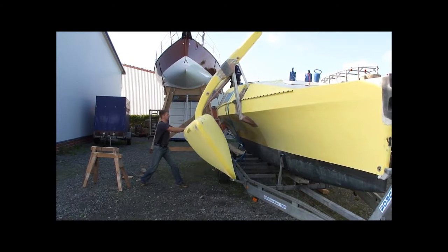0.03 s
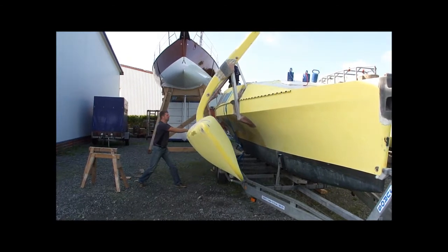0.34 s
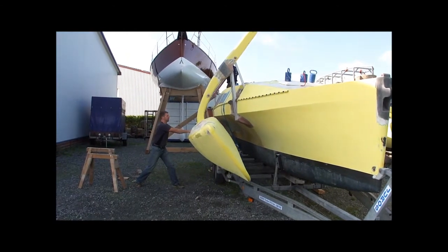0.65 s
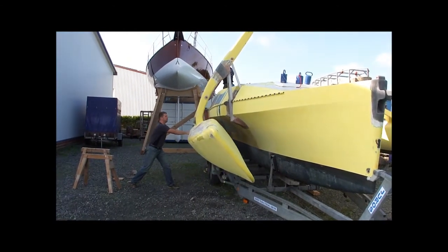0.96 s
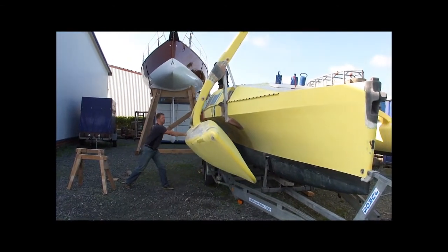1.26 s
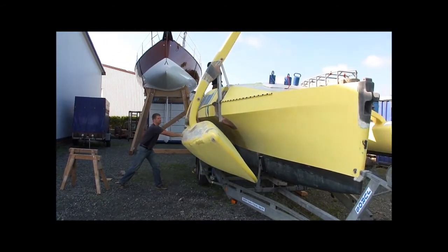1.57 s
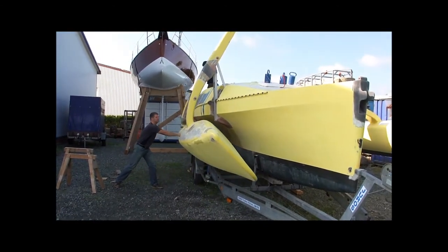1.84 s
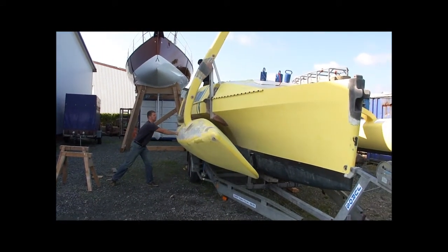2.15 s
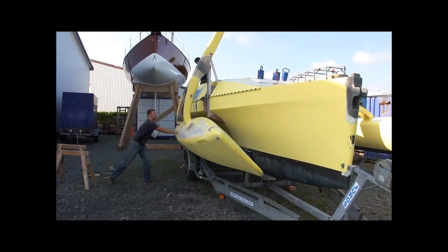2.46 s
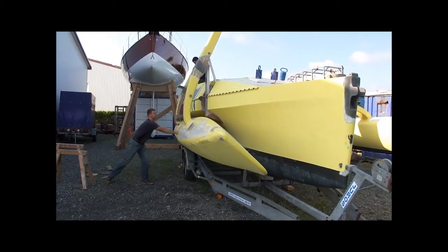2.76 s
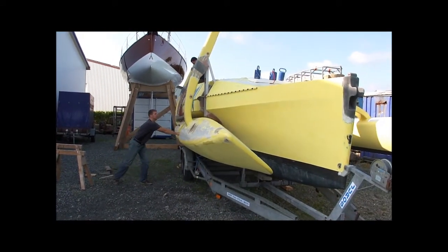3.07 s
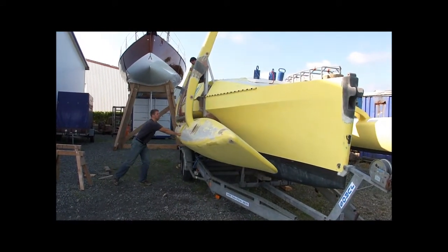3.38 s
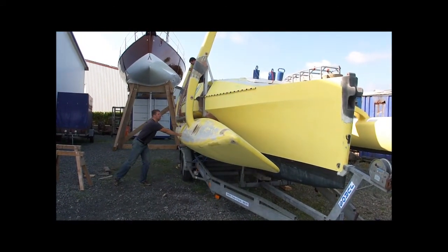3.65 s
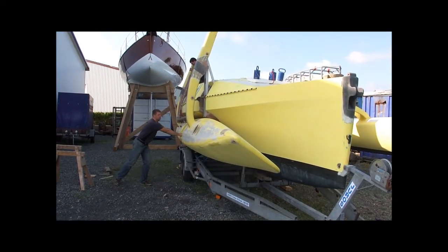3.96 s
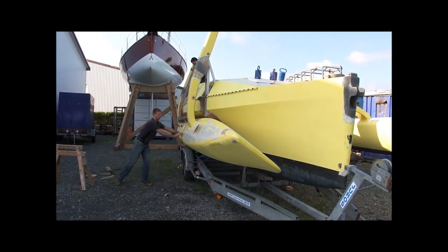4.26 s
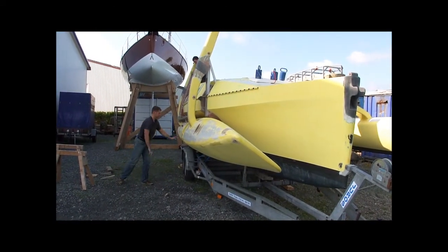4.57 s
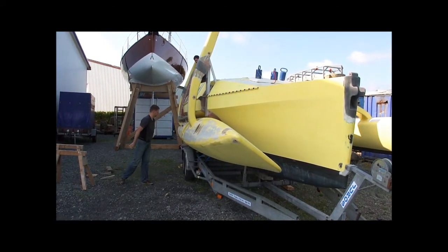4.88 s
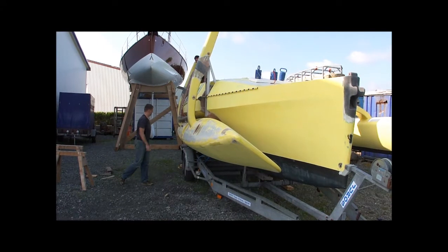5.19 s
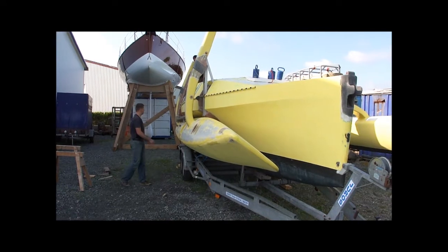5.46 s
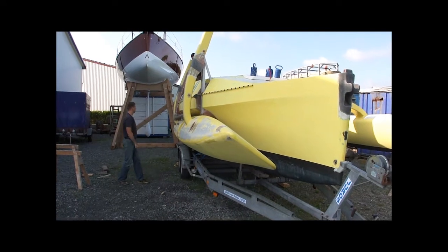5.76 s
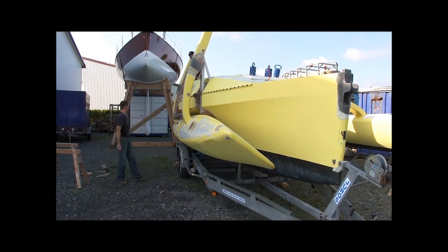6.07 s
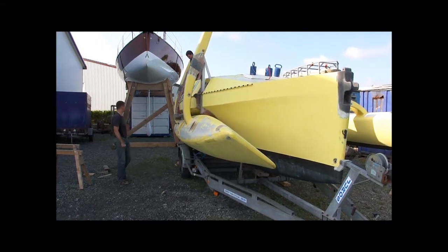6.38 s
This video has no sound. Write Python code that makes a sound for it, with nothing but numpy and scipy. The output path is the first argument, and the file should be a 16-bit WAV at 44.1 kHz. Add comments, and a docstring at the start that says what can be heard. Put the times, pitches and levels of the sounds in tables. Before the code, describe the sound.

Irregular hollow knocks, scrapes and short creaks as a boat's float is pushed in, then footsteps on gravel, over a steady outdoor rush.

```python
"""A man pushes a trimaran's hollow float in on its folding arms, over a gravel boatyard's steady rush.
First the camera's zoom motor ticks. Then the joints stick and slip: knocks, scrapes and short groans
excite the modes of arm and hull, while a thin whine, far whistles and two microphone pops come and go.
Midway the zoom runs again and shoes crunch on the stones. Near the end come more steps and whistles,
one more pop and the last knocks, and finally the friction of fingers on the camera."""
import sys
import numpy as np
from scipy import signal
from scipy.fft import rfft, irfft, next_fast_len
from scipy.io import wavfile

SR = 44100
rng = np.random.default_rng(int(sys.argv[2]) if len(sys.argv) > 2 else 0)


def dump_mix(stems):
    """Bounce the given channels to the path in sys.argv[1] as a 16-bit WAV at rate SR."""
    frames = np.atleast_2d(stems).T  # one column per channel
    limited = np.clip(frames, -1, 1)  # hard clip at full scale
    pcm = np.round(limited * 32767).astype(np.int16)
    wavfile.write(sys.argv[1], SR, pcm)


N = 283563
T = np.arange(N) / SR


# normal modes of the float's shell and of the arm: (frequency [Hz], level [dB], decay time T60 [s])
HULL_MODES = [(138.9, -15, 0.7), (173.4, -1, 0.32), (214, -14, 0.5), (228.5, -1.5, 0.51),
              (272.2, -6.5, 0.48), (306, -3, 0.4), (342, 1.5, 0.28), (628, 2, 0.27), (740, 7.5, 0.36),
              (780, -14, 0.11), (882, -2, 0.31), (1537, 4.5, 0.15), (2070, -21, 0.15)]
ARM_MODES = [(286.2, -10.5, 0.26), (393, -8, 0.45), (511.2, -8, 0.33), (548, -2.5, 0.34), (690, -6, 0.32),
             (755, 1, 0.22), (1085, 0, 0.11), (1272, -5, 0.05), (1804, -25, 0.076), (2250, -9, 0.22)]
# spectra of a knock's three parts: (frequency [Hz], spectral level [dB])
CLATTER_SPECTRUM = [(25, -58), (80, -79), (250, -8.5), (450, 1), (800, 3.5), (1100, 1), (1500, -2),
                    (2100, -5.5), (2700, -13), (5000, -32), (10000, -47), (16000, -72)]
BOOM_SPECTRUM = [(25, -50), (60, -1), (110, 1.5), (170, 16.5), (230, 14), (290, 17), (420, 0.5),
                 (1000, -64)]
CRACK_SPECTRUM = [(1000, -32), (3000, -18), (6000, 7), (8000, 2.5), (10000, 1), (16000, -1)]
# slips of the joints: (time [s], clatter [dB], boom [dB], crack [dB], clatter tilt [dB/octave])
JOINT_KNOCKS = [(0.411, -26, -30, -59, 7), (0.453, -13, -23.5, -43, 2.5), (0.493, -21.5, -27, -48, -11),
                (0.620, -13.5, -20.5, -43, 3.5), (0.648, -28, -25, -50, 6), (0.666, -18.5, -17, -36, 11),
                (0.711, -15, -38, -45, 0), (0.734, -18, -21, -58, -4), (0.751, -23, -26.5, -60, -23),
                (0.769, -14.5, -24, -43.5, 3.5), (0.792, -36, -24.5, -56, 8), (0.858, -17, -35, -47, 2.5),
                (0.883, -19, -24, -60, -9), (0.982, -15.5, -28, -45, -1), (1.007, -19, -25.5, -54, -7),
                (1.085, -32, -36, -60, -6), (1.537, -23.5, -33.5, -57, -1), (1.671, -20.5, -18.5, -41, 0.5),
                (1.769, -16.5, -28, -44.5, -3), (1.848, -23, -24, -66, -5), (1.987, -25, -29, -61, -6),
                (2.153, -27, -44, -64, -15), (2.651, -15.5, -41, -62, -3.5), (2.671, -21, -35, -62, -10),
                (2.701, -21.5, -26.5, -66, -8), (2.725, -17, -19, -60, -3), (2.797, -14, -42, -40.5, -1),
                (2.825, -15.5, -15.5, -36.5, 1.5), (2.844, -16.5, -26, -49, -4.5),
                (2.897, -21.5, -37, -51, -1), (2.931, -16.5, -30, -46, 1.5),
                (2.987, -15.5, -20.5, -32, -5.5), (3.013, -28, -21, -38, 2), (3.038, -17.5, -30, -48, 3),
                (3.068, -32, -34, -49, -2), (3.123, -15, -27, -42.5, 4), (3.146, -15.5, -22.5, -46, -2.5),
                (3.189, -12.5, -20, -45, -2), (3.221, -30, -27, -58, -4), (3.263, -36, -34.5, -58, 1),
                (3.527, -29.5, -46, -68, -2), (3.572, -37, -54, -64, -10), (3.755, -23.5, -26.5, -50, 2.5),
                (3.774, -20, -35, -47, 5), (3.809, -15.5, -34, -40.5, 1.5), (3.864, -16.5, -15, -48, 1),
                (3.884, -25, -27, -46, -5), (3.901, -29, -27, -58, -3), (3.927, -20.5, -27.5, -56, 3),
                (4.125, -11, -16.5, -42.5, -2), (4.195, -17.5, -23, -43.5, 3), (4.237, -26.5, -31, -62, -3),
                (4.509, -25, -46, -42, 0), (4.912, -32, -47, -66, -3.5), (5.765, -17.5, -26, -40, 2),
                (5.846, -9.5, -18, -41, -0.5), (5.907, -37, -34, -65, -9)]
def knocks():
    """Impulse excitation: a slip cracks at the joint, clatters in the arm and booms in the float."""
    out, t = np.zeros((2, N)), np.arange(SR // 2) / SR
    give_s, boom_rise_s, ring = 0.003, 0.004, 0.69
    attack = 1 - np.exp(-(t / give_s) ** 2)  # the joint gives a little before it lets go
    swing_up = 1 - np.exp(-(t / boom_rise_s) ** 2)  # the big shell responds more slowly
    for s, clatter_db, boom_db, crack_db, tilt_db in JOINT_KNOCKS:
        stutter = amp(1.8 * np.interp(t * 350, np.arange(400), rng.standard_normal(400)))
        rattle = burst(t, tilted(CLATTER_SPECTRUM, tilt_db, 690), 1070, 0.74, direct=1.54, direct_s=0.013)
        clatter = amp(-3) * unit_hit(stutter * rattle) + amp(-6.5) * modal_ring(t, ARM_MODES, tilt_db)
        thud = burst(t, BOOM_SPECTRUM, 200, ring, direct=0.45, direct_s=0.0016)
        boom = amp(-4.5) * thud + amp(-2.85) * modal_ring(t, HULL_MODES)
        crack = amp(3) * burst(t, CRACK_SPECTRUM, 7000, ring, direct=0.89, direct_s=0.005)
        joint = amp(clatter_db) * clatter + amp(crack_db) * crack
        add(out, s - .0025, joint * attack + amp(boom_db) * boom * swing_up)
    return out


# catches of a slipping joint: (time [s], frequency [Hz], level [dB], rise to the peak [cycles])
JOINT_JOLTS = [(0.6229, 835, -9, 0.52), (0.668, 232, -6, .8), (0.6893, 385, -10, 0.49),
               (0.7105, 1050, -7, 0.66), (0.772, 900, -3.5, 0.45), (0.8595, 780, -8, 1.8),
               (0.889, 430, -10, 0.51), (0.9835, 790, -11, 1.4), (1.0096, 375, -8, 0.51),
               (1.428, 910, -7, 0.43), (1.673, 216, -15, 1.4), (2.154, 660, -29, 1.7),
               (2.6505, 1580, -3, 0.45), (2.671, 550, -25, .37), (2.8265, 225, -11.5, 1.4),
               (2.8273, 520, -9, 0.39), (2.989, 1080, -2.5, 0.42), (3.1915, 670, -3, 0.88),
               (3.528, 553, -15.5, 2), (3.5715, 605, -21, 1.5), (3.8645, 258, -4, 0.88),
               (3.8694, 516, -18, 0.41), (3.8843, 470, -8, 0.52), (4.1285, 786, -11, 0.98),
               (5.7655, 725, -17, 0.73), (5.849, 174, -17, 1.4), (5.85, 664, -6, 0.5)]
def jolts():
    """Heavy damping: a joint that catches swings the float's side for only a few cycles."""
    out, t = np.zeros((2, N)), np.arange(SR // 12) / SR
    for s, hz, db, rise_cycles in JOINT_JOLTS:
        age = hz * t / rise_cycles
        swing = np.sin(2 * np.pi * hz * t) * age * np.exp(1 - age)
        add(out, s, np.outer([1, 0], amp(db) * swing))
    return out


# one dry click: (frequency [Hz], spectral level [dB])
CRUNCH_SPECTRUM = [(200, -27), (700, 1), (1200, 1.5), (1800, 4), (2400, 1.5), (2900, -4), (5000, -24),
                   (12000, -52)]
# grinding in the joints: (time [s], duration [s], level [dB])
JOINT_CRUNCHES = [(0.604, .012, -32), (0.712, .011, -27), (0.767, .011, -34), (.789, .01, -38),
                  (0.853, .012, -29), (1, .008, -33), (1.541, .03, -34), (1.683, .024, -31),
                  (1.776, .02, -27), (1.845, .014, -35), (1.984, .012, -31), (2.666, .008, -40),
                  (2.829, .008, -26), (2.988, .004, -34), (3.034, .018, -29), (3.129, .008, -37),
                  (3.775, .018, -35), (3.867, .012, -30), (3.933, .04, -33), (4.126, .006, -30)]
def crunches():
    """Asperity contact: rough faces in a joint grind out a quick, uneven run of ringing clicks."""
    out, t = np.zeros((2, N)), np.arange(SR // 6) / SR
    clicks_per_s = 280
    for s, length, db in JOINT_CRUNCHES:
        wait, size = rng.uniform(.5, 1.5, (2, 16))
        onsets = (np.cumsum(wait) - wait[0]) / clicks_per_s
        run = np.bincount((onsets * SR).astype(int), size * (onsets <= length))
        click = burst(t, CRUNCH_SPECTRUM, 1800, 0.84, direct=4.4, direct_s=0.0021)
        add(out, s, amp(db) * signal.fftconvolve(run[None] / np.linalg.norm(run), click, axes=1))
    return out


def slips(spots, per_s=130, jitter=.6, spread_db=2):
    """Stick-slip friction: impulses at uneven intervals, dealt out among the contact spots."""
    wait, size, spot = rng.standard_normal((3000, 3)).T
    onsets = (np.cumsum(np.exp(jitter * wait)) / per_s * SR).astype(int)
    clicks, inside = np.zeros((spots, N)), onsets < N
    strength = amp(spread_db * np.clip(size[inside], -2, 1.5))
    clicks[np.argsort(spot)[inside] % spots, onsets[inside]] = strength
    return clicks


# drags of the joints: (time [s], duration [s], level [dB])
JOINT_SCRAPES = [(.61, 0.23, -40), (.97, 0.2, -33), (1.39, 0.01, -20.5), (1.535, 0.022, -35),
                 (1.68, 0.089, -30), (2.65, 0.15, -32), (2.83, 0.27, -26), (3.6, 0.14, -45),
                 (3.805, 0.05, -15.5), (4.085, 0.036, -25)]
def scrapes():
    """Convolution: each small slip of a dragging joint sets off the impulse response of arm and hull."""
    t, chatter = np.arange(SR // 4) / SR, np.zeros((2, N))
    for clicks in slips(spots=4):
        response = burst(t, CLATTER_SPECTRUM, 900, 0.49, direct=1.3, direct_s=0.0044)
        response += amp(-7) * modal_ring(t, ARM_MODES) + amp(-8) * modal_ring(t, HULL_MODES)
        chatter += signal.oaconvolve(clicks[None], response, axes=1)[:, :N]
    return strokes(JOINT_SCRAPES, attack_s=0.022, release_s=0.021) * unit(chatter)


# the float's low murmur: (frequency [Hz], spectral level [dB])
MURMUR_SPECTRUM = [(150, -40), (280, -31), (420, -7.5), (540, 5), (730, 0.5), (900, -16), (1500, -41)]
# pushes on the float: (time [s], duration [s], level [dB])
FLOAT_PUSHES = [(-.1, 0.19, -28.5), (.85, 0.24, -30), (1.7, 0.28, -30.5), (2.75, 0.48, -33),
                (3.42, 0.33, -32.5), (4.25, 0.84, -40.5)]
def murmur():
    """Forced vibration: the float murmurs while each push turns the arms."""
    vibration = noise(MURMUR_SPECTRUM) * amp(4.5 * wander(35))
    return strokes(FLOAT_PUSHES, attack_s=0.22, release_s=0.24) * vibration


# groans and a squeak: (time [s], duration [s], start frequency [Hz], end frequency [Hz], level [dB])
JOINT_GROANS = [(0.377, 0.042, 1980, 1940, -32), (0.448, 0.021, 868, 740, -19.5),
                (0.667, 0.03, 690, 882, -18.5), (0.861, 0.016, 772, 715, -19.5),
                (0.904, 0.026, 810, 840, -27), (1.072, 0.03, 690, 705, -25), (1.16, 0.033, 613, 656, -23.5),
                (1.684, 0.05, 606, 684, -22.5), (1.765, 0.071, 598, 674, -21),
                (1.847, 0.066, 647, 666, -27.5), (1.978, 0.065, 663, 648, -25),
                (2.822, 0.046, 595, 665, -25.5), (3.863, 0.051, 755, 902, -19)]
def groans(jitter=.04, flutter_db=3.5):
    """Self-excited oscillation: a joint sticks and slips fast enough to make a short, rough note."""
    out = np.zeros((2, N))
    for s, length, start_hz, end_hz, db in JOINT_GROANS:
        size = int(length * SR)
        hz = np.linspace(start_hz, end_hz, size) * (1 + jitter * wander(355)[:size])
        phase = 2 * np.pi * np.cumsum(hz) / SR
        grip = np.hanning(size) * amp(flutter_db * wander(209)[:size])
        note = np.sin(phase) + 0.07 * np.sin(2 * phase) + 0.055 * np.sin(3 * phase)
        add(out, s, np.outer([1, 0], amp(db) * unit(grip * note)))
    return out


def grains(per_s, spread_db):
    """A Poisson process: sparse, independent clicks of very uneven size."""
    size = amp(spread_db * np.minimum(rng.exponential(1, N), 4)) * rng.choice([-1, 1], N)
    return size * (rng.random(N) < per_s / SR)


# shoes pressing into gravel: (time [s], duration [s], level [dB])
FOOTSTEPS = [(2.82, 0.1, -38), (2.98, 0.054, -36), (3.04, 0.082, -62), (5.235, 0.14, -45.5),
             (5.38, 0.1, -37)]
# hard snaps of stones and fittings: (time [s], level [dB], tilt [dB/octave])
SNAPS = [(0.408, -21, 1), (0.444, -29, 3), (1.987, -37, -8), (2.651, -26.5, 6), (2.886, -23, -7),
         (2.964, -19.5, -4), (3.104, -27, -2), (3.8648, -22, -11), (4.532, -30, 3), (4.661, -26, -6),
         (5.256, -14.5, 0), (5.308, -15.5, 2), (5.354, -23, 6), (5.389, -7.5, 8), (5.466, -21, 0)]
def gravel():
    """Granular friction: shoes grind small stones in many tiny collisions, with a few hard snaps."""
    t = np.arange(SR // 16) / SR
    energy = signal.oaconvolve(grains(per_s=1000, spread_db=5.5) ** 2, np.exp(-t / 0.005))[:N]
    grit = np.sqrt(abs(energy)) * rng.standard_normal((2, N))
    tread = strokes(FOOTSTEPS, attack_s=0.049, release_s=0.035)
    trickle = amp(-13) * strokes(FOOTSTEPS, attack_s=0.049, release_s=0.71)  # loose stones settle
    grind = colour(grit, [(50, -7), (200, -10), (900, 0), (1900, 3), (4000, -22.5), (9000, -91)])
    out = (tread + trickle) * (colour(grit, CRACK_SPECTRUM) + amp(9.5) * grind)
    snap_decay = np.exp(-t / 0.00041) + 0.12 * np.exp(-t / 0.026)
    for s, db, tilt_db in SNAPS:
        add(out, s, amp(db) * noise(tilted(CRACK_SPECTRUM, tilt_db, 7000), len(t)) * snap_decay)
    return out


# one motor step: (frequency [Hz], spectral level [dB])
TICK_SPECTRUM = [(2500, -8), (4500, -6.5), (5500, -0.5), (7000, -9), (10000, -24)]
# runs of the motor: (start [s], stop [s], tick level [dB], whine level [dB])
ZOOM_RUNS = [(.005, .37, -52.5, -64), (2.186, 2.55, -57, -67), (2.583, 4.3, -54, -62),
             (4.304, 4.69, -52.5, -65), (4.742, 4.77, -52, -68), (4.804, 4.81, -46.5, -68)]
def zoom_motor(steps_per_s=50, whine_hz=7205):
    """Periodic excitation: the lens motor ticks at every step and whines on every other one."""
    out, t = np.zeros((2, N)), np.arange(SR // steps_per_s) / SR
    tick_decay = np.exp(-t / .0012) + .16 * np.exp(-t / .006)
    for start, stop, tick_db, whine_db in ZOOM_RUNS:
        for step, s in enumerate(np.arange(start, stop, 1 / steps_per_s)):
            size, detune = rng.uniform(-0.32, 1, 2)
            tick = colour(rng.standard_normal((2, len(t))) * tick_decay, TICK_SPECTRUM)
            add(out, s, amp(tick_db + 3.7 * size) * tick)
            if step % 2 == 0:
                tone = np.sin(2 * np.pi * whine_hz * (1 + 0.005 * detune) * t)
                whine = unit(tone * signal.windows.tukey(len(t), .4))
                add(out, s, amp(whine_db + 6.3 * size) * np.outer([1, .6], whine))
    return out


# pops in the microphone: (time [s], frequency [Hz], left gain [dB], right gain [dB], snap level [dB])
MICROPHONE_POPS = [(1.267, 177, 7.5, -16, -62), (1.461, 231, 13, -5, -22.5), (5.502, 129, -26, -3, -57)]
def pops():
    """Transient response: a pop is one quickly damped swing with a tiny broadband snap."""
    out, t = np.zeros((2, N)), np.arange(SR // 25) / SR
    for s, hz, left_db, right_db, snap_db in MICROPHONE_POPS:
        cycles = hz * t
        envelope = (cycles / 0.38) ** 2 * np.exp(2 - cycles / 0.23) / 4
        swing = -amp(-7) * np.sin(2 * np.pi * cycles) * envelope
        add(out, s - .0006, np.outer(amp([left_db, right_db]), swing))
        add(out, s + 0.00154, -np.outer([1, .3], amp(snap_db) * np.exp(-t / 0.00018)))
    return out


# skin on the camera body: (frequency [Hz], spectral level [dB])
RUB_SPECTRUM = [(100, -37), (400, 14), (650, -21), (950, 6), (1300, 0), (1750, 11), (2300, -0.5),
                (3200, -26), (6000, -20.5), (10000, -31), (16000, -41)]
# finger strokes: (time [s], duration [s], relative level [dB])
FINGER_RUBS = [(6.01, 0.13, -36), (6.125, 0.017, -40), (6.146, 0.035, -32.5), (6.29, 0.008, -25),
               (6.32, 0.0061, -30.5), (6.39, .04, -36.5)]
def handling():
    """Sliding friction: fingers rub grainy noise from the camera body, louder on the left."""
    friction = colour(rng.standard_normal((2, N)) * amp(2.1 * wander(250)), RUB_SPECTRUM)
    rubbing = amp(-4) * friction * strokes(FINGER_RUBS, attack_s=0.0026, release_s=0.044)
    left_db = [(400, 2.3), (1000, 11.8), (1800, 9.1), (3000, 16.7), (7000, 9)]
    return ports(rubbing, left_db, coherence=[(300, 0.74), (2000, 0.96), (5000, .3)])


# far whistles: (time [s], duration [s], centre frequency [Hz], bandwidth [Hz], level [dB])
FAR_WHISTLES = [(1.173, 0.3, 6050, 695, -58), (1.517, 0.1, 6250, 800, -57.5), (1.742, 0.3, 6500, 170, -58),
                (4.97, .07, 5630, 400, -59), (5.25, 0.27, 5830, 500, -52), (5.377, 0.39, 6600, 170, -52.5),
                (5.495, 0.34, 6040, 600, -59)]
def whistles():
    """Narrow-band noise heard as pitch: thin tones blurred by distance, perhaps a small bird."""
    out = np.zeros((2, N))
    for s, length, hz, width_hz, db in FAR_WHISTLES:
        tone = narrow_band(hz, width_hz, SR)[:, :int(length * SR)]
        add(out, s, amp(db) * unit(tone * signal.windows.tukey(tone.shape[1], .6)))
    return out


# spells of a high whine: (time [s], duration [s], level [dB])
WHINE_SPELLS = [(.42, .34, -57), (.8, 0.41, -59), (4.78, 0.35, -57), (6.02, .38, -56)]
def high_whine():
    """Amplitude modulation: a thin tone shimmers, from an insect or the camera's electronics."""
    tone = narrow_band(hz=10650, width_hz=120, size=next_fast_len(N))[:, :N]
    return unit(tone * amp(1.5 * wander(9.6))) * strokes(WHINE_SPELLS, attack_s=.05, release_s=.03)


# the yard's rush and the background hiss: (frequency [Hz], spectral level [dB])
RUSH_SPECTRUM = [(20, -21), (45, -21), (85, -20), (130, -13), (230, -5.5), (330, -4), (450, -0.5),
                 (720, -2), (1050, -6.5), (1400, -10.5), (2000, -11.5), (2700, -22.5), (5000, -44.5),
                 (16000, -35)]
HISS_SPECTRUM = [(1000, -12), (3500, -4.5), (5500, 5.5), (7500, 2.5), (10000, 0), (16000, 2)]
# background levels: (time [s], relative level [dB])
RUSH_LEVELS = [(0, -29), (.45, -31), (1.4, -31), (2.3, -34), (3.6, -32), (4.05, -33), (4.4, -32.5),
               (4.9, -33.5), (5.4, -32.5), (6.43, -32)]
HISS_LEVELS = [(0, -55), (.7, -55.5), (1.08, -56), (1.2, -53.5), (1.42, -54.5), (1.46, -60.5), (2.2, -60.5),
               (3.2, -55.5), (4.3, -60.5), (5.05, -56), (5.6, -53), (6.1, -55)]  # ducks abruptly at the loud pop, then slowly recovers
# the rush at the left port against the right: (frequency [Hz], level difference [dB])
YARD_LEFT_DB = [(50, -5), (200, -4.5), (480, -9), (800, -8.5), (1050, -3), (1280, -5.5), (1700, -3),
                (3000, 1.5), (8000, -15)]
# its likeness at the two ports: (frequency [Hz], coherence [0-1])
YARD_COHERENCE = [(40, 0.27), (150, 0.87), (650, 1), (1050, 0.51), (2400, 0.48), (5000, 1)]
def background():
    """Broadband noise: the yard's steady, slightly restless rush, with a smooth hiss above it."""
    rush = noise(RUSH_SPECTRUM) * amp(1.4 * wander(45)) * level(RUSH_LEVELS) * amp(4.5)
    hiss = noise(HISS_SPECTRUM) * level(HISS_LEVELS) * amp(8.5)
    return ports(rush, YARD_LEFT_DB, YARD_COHERENCE) + hiss


def modal_ring(t, modes, tilt_db=0):
    """Modal superposition: each blow meets the modes in other phases, strengths and strain."""
    hz, db, t60 = np.transpose(modes)[:, :, None]
    strain = 1 + 0.012 * rng.standard_normal(hz.shape)
    db = db + tilt_db * np.log2(hz / 900) + 2.5 * rng.standard_normal(hz.shape)
    phase = 2 * np.pi * (hz * strain * t + rng.random(hz.shape))
    return unit_hit((amp(db - 60 * t / t60) * np.sin(phase)).sum(0))


# the boat's dense ringing: (frequency [Hz], base decay time T60 [s])
RING_TIMES = [(100, 0.51), (400, 0.7), (900, 0.58), (2000, 0.33), (8000, 0.41)]
def burst(t, spectrum, hz, ring, direct, direct_s):
    """Exponential decay: a short direct blow, and dense ringing for ring times the base T60 at hz."""
    t60 = ring * read(RING_TIMES, hz)
    fade = amp(-60 * t / t60) + direct * np.exp(-t / direct_s)
    return unit_hit(noise(spectrum, len(t)) * fade)


# the left microphone port against the right: (frequency [Hz], phase difference [rad])
PORT_PHASES = [(30, -5), (100, -0.9), (300, -1.65), (600, -2), (1100, -3), (2000, -3.5), (8000, -5)]
def ports(pair, left_db, coherence):
    """Partial coherence: the right port gets row 0; the left a lagging blend with scattered row 1."""
    size = next_fast_len(N)
    direct, scattered = rfft(pair, size)
    hz = np.fft.rfftfreq(size, 1 / SR)
    shared = np.clip(read(coherence, hz), 0, 1)
    blend = shared * direct + np.sqrt(1 - shared ** 2) * scattered
    left = blend * amp(read(left_db, hz)) * np.exp(1j * read(PORT_PHASES, hz))
    return irfft(np.array([left, direct]), size)[:, :N]


def amp(db):
    """Amplitude ratio from decibels."""
    return 10 ** (np.asarray(db) / 20)


def unit(x):
    """Normalisation to rms 1."""
    return x / np.sqrt(np.mean(x ** 2) + 1e-20)


def unit_hit(x):
    """Normalisation of a hit to rms 1 over its first 40 ms."""
    return x / np.sqrt(np.mean(x[..., :SR // 25] ** 2, axis=-1, keepdims=True) + 1e-20)


def read(points, hz):
    """Interpolation of a curve at hz, on a log frequency axis."""
    f, value = np.transpose(points)
    return np.interp(np.log(hz + 1), np.log(f), value)


def level(curve):
    """Interpolation of a dB curve into a gain for every sample."""
    return amp(np.interp(T, *np.transpose(curve)))


def strokes(rows, attack_s, release_s):
    """Amplitude envelope: each stroke rises linearly and, after its duration, decays exponentially."""
    return sum(amp(db) * np.clip((T - s) / attack_s, 0, 1)
               * np.exp(-np.clip((T - s - length) / release_s, 0, 20)) for s, length, db in rows)


def wander(per_s):
    """Random modulation: a curve of rms 1 through per_s random points a second."""
    knots = rng.standard_normal(8000)
    return unit(np.interp(T * per_s, np.arange(8000), knots))


def tilted(spectrum, tilt_db, pivot_hz):
    """Spectral tilt of tilt_db per octave near a pivot."""
    return [(hz, db + tilt_db * np.clip(np.log2(hz / pivot_hz), -1.5, 1.5)) for hz, db in spectrum]


def colour(x, spectrum):
    """Linear filtering of x by a spectrum, at rms 1."""
    size = next_fast_len(x.shape[-1])
    gain = amp(read(spectrum, np.fft.rfftfreq(size, 1 / SR)))
    return unit(irfft(rfft(x, size) * gain, size)[..., :x.shape[-1]])


def noise(spectrum, size=N):
    """Coloured noise in two independent rows."""
    return colour(rng.standard_normal((2, size)), spectrum)


def narrow_band(hz, width_hz, size):
    """Gaussian band-pass filtering of two rows of white noise."""
    band = np.exp(-((np.fft.rfftfreq(size, 1 / SR) - hz) / width_hz * 2) ** 2)
    return irfft(rfft(rng.standard_normal((2, size))) * band, size)


def add(mix, s, sound):
    """Superposition of a two-row sound on the mix at time s."""
    part = mix[:, max(round(s * SR), 0):][:, :sound.shape[1]]
    part += sound[:, :part.shape[1]]


# the boat at the left port against the right: (frequency [Hz], level difference [dB])
BOAT_LEFT_DB = [(50, -1), (200, -5.5), (520, -9), (750, -12), (1050, -11), (1300, -12.5), (1800, -10),
                (3500, -14.5), (7000, -32), (15000, -25)]
# its likeness at the two ports: (frequency [Hz], coherence [0-1])
BOAT_COHERENCE = [(40, 0.5), (150, 0.89), (900, 0.87), (1600, 1), (2600, 0.78), (6000, 1)]
def scene():
    """Localisation: level and phase differences put boat and man on the right, amid the other sounds."""
    boat_and_man = knocks() + jolts() + crunches() + scrapes() + murmur() + groans() + gravel()
    placed = ports(boat_and_man, BOAT_LEFT_DB, BOAT_COHERENCE)
    return placed + background() + whistles() + high_whine() + zoom_motor() + handling()


# narrow dips at 3-5 kHz and a dulled top at 12-14 kHz: (frequency [Hz], width [Hz], depth [dB])
TREBLE_DIPS = [(3010, 162, 26), (3570, 1663, 11.5), (4024, 160, 25), (5045, 142, 15), (12150, 940, 26),
               (13440, 2500, 26.5)]
def record(dry):
    """Saturation and filtering: peaks are rounded, the treble dips, pops join, the band is limited."""
    ceiling, bass_cut_hz, band_edge_hz = .9, 85, 15900
    size = next_fast_len(N)
    hz = np.fft.rfftfreq(size, 1 / SR)
    rounded = dry / (1 + (dry / ceiling) ** 6) ** (1 / 6)
    cut_db = sum(depth * np.exp(-((hz - centre) / width) ** 2) for centre, width, depth in TREBLE_DIPS)
    spectrum = rfft(rounded, size) * amp(-cut_db) + rfft(pops(), size)
    high_passed = irfft(spectrum * hz ** 2 / np.hypot(hz ** 2, bass_cut_hz ** 2), size)[:, :N]
    low_pass = signal.firwin(511, band_edge_hz, window=("kaiser", 9), fs=SR)
    return signal.oaconvolve(high_passed, low_pass[None], "same")


dry = scene()
out = record(dry)
dump_mix(out)
```